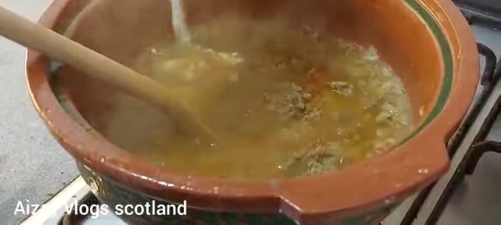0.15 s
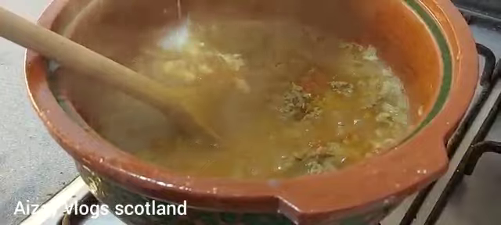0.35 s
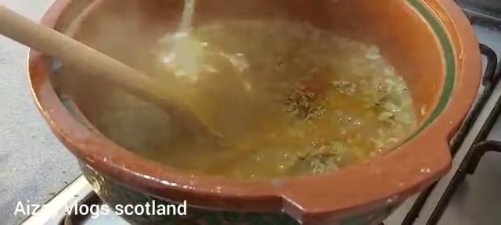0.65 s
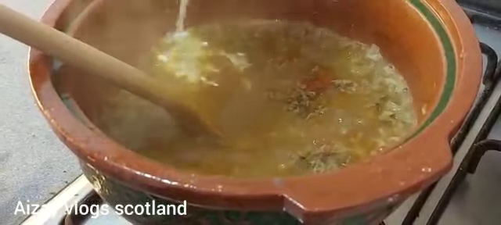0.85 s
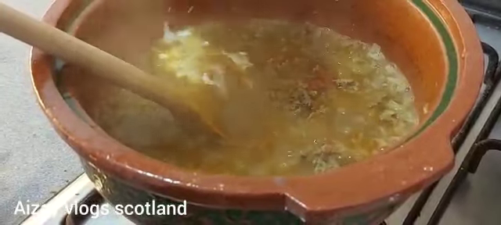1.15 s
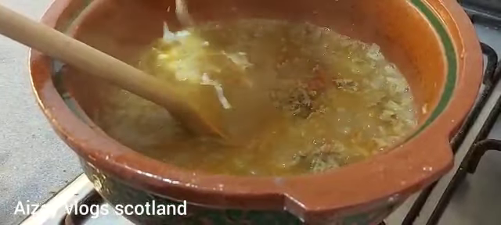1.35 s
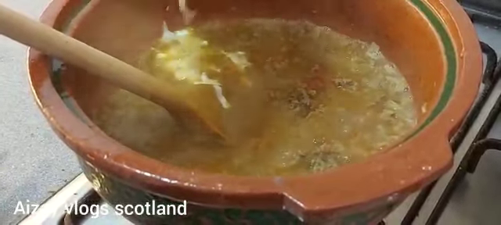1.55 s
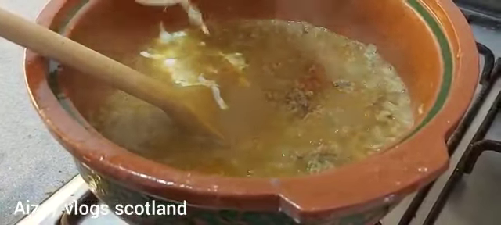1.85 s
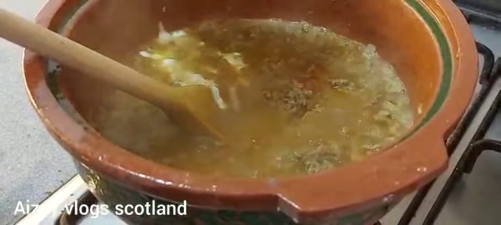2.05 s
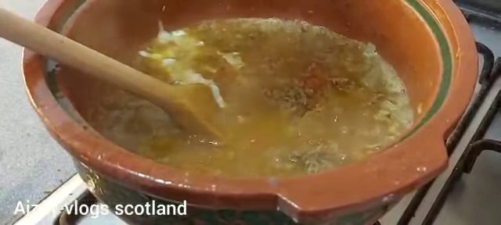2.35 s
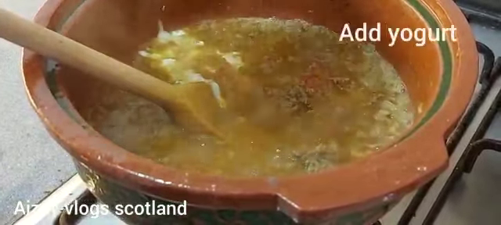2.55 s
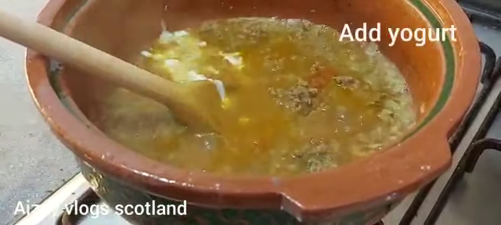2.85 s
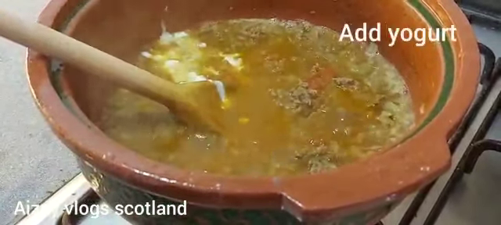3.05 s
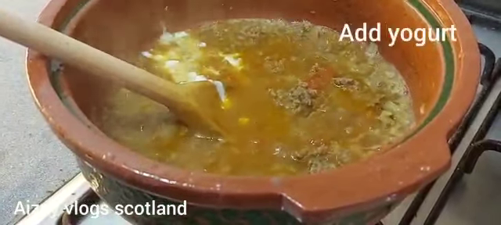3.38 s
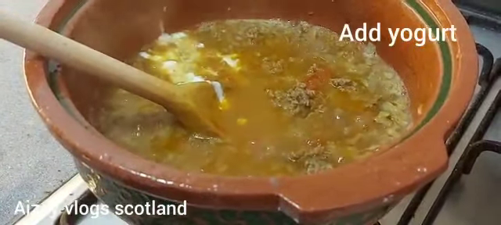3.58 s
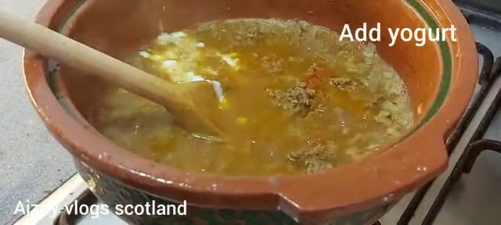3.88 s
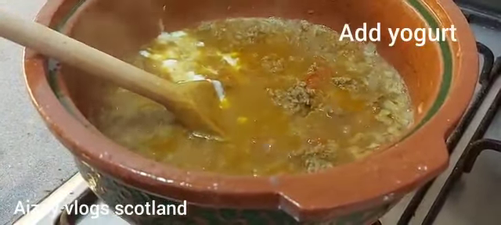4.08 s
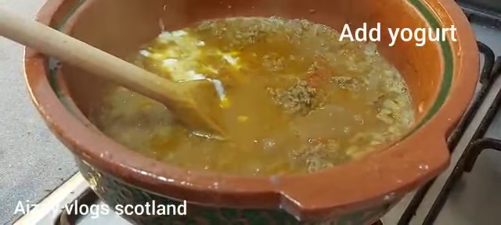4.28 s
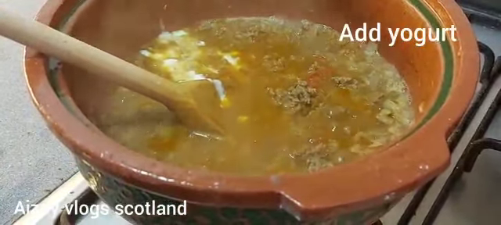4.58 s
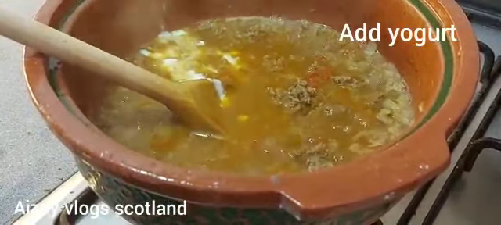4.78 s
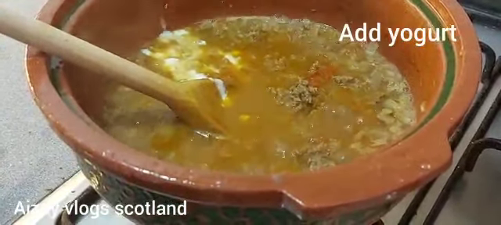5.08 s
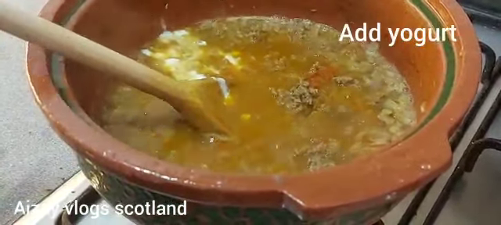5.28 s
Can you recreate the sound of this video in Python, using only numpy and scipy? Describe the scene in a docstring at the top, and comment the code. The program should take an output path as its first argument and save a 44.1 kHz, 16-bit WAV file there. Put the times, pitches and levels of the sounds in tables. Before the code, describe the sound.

Minced meat and sauce simmer in a clay pot on a gas stove, a soft, steady bubbling under a fine hiss of fat. Yogurt drops in with a few wet splats at the start. Single bubbles pop and droplets spit throughout, over a faint low rumble and soft bumps. Two dull knocks come near the end, the second louder. The sound is close, in a small kitchen.

```python
"""Minced meat simmering in a clay pot

On a gas stove in a small kitchen, yogurt splats into the sauce and the trapped air rings.
Bubbles, each a damped oscillator, burst in the sauce and crackle in the fat at the rim;
larger ones pop and droplets spit, over a low rumble, a faint hum and some dull shuffling.
A few soft bumps and two dull knocks set the stove and the room ringing."""
import sys
import numpy as np
from scipy import signal
from scipy.fft import rfft, irfft, next_fast_len
from scipy.io import wavfile
from scipy.ndimage import map_coordinates

SR = 44100
rng = np.random.default_rng(int(sys.argv[2]) if len(sys.argv) > 2 else 0)


def inscribe(sig):
    """Save sig as 16-bit PCM at rate SR to the path in sys.argv[1].

    A 1-D sig is mono; a 2-D sig holds one channel per row.
    Samples are clipped to [-1, 1] before scaling.
    """
    pcm = np.round(np.clip(np.atleast_2d(sig).T, -1, 1) * 32767)
    wavfile.write(sys.argv[1], SR, pcm.astype(np.int16))


N = 239354
TOP_HZ = 15850
# soft contacts: t/s, level/dB, f/Hz
SOFT_BUMPS = [(0.174, -43.5, 106), (1.312, -39.5, 88), (2.427, -33.5, 88.5), (2.469, -32.5, 101),
              (2.842, -36, 103), (4.246, -32.5, 106), (4.297, -38, 112), (4.4, -34.5, 79.6),
              (4.435, -36.5, 90.6), (5.37, -39.5, 110)]


def amp(db):
    """Amplitude ratio of a level in decibels."""
    return 10 ** (np.asarray(db) / 20)


def unit(x):
    """Normalisation to rms 1."""
    return x / np.sqrt(np.mean(x ** 2) + 1e-20)


def crest(x):
    """Normalisation to peak 1."""
    return x / (np.abs(x).max() + 1e-20)


def along(points, hz):
    """Interpolation of (f/Hz, value) points on a logarithmic frequency axis."""
    f, v = np.transpose(points)
    return np.interp(np.log(hz + 1), np.log(f + 1), v)


def wobble(rate):
    """Slow random modulation: a spline through rate knots a second."""
    knots = rng.standard_normal(int(N * rate / SR) + 4)
    return map_coordinates(knots, [np.arange(N) * rate / SR])


def filtered(x, response):
    """Linear filtering: the spectrum times a frequency response."""
    n = x.shape[-1]
    m = next_fast_len(n + SR // 4)
    return irfft(rfft(x, m) * response(np.fft.rfftfreq(m, 1 / SR)), m)[..., :n]


def resonance(f, hz, width):
    """Band-pass response of a damped oscillator."""
    return 1j * f * width / (hz * hz - f * f + 1j * f * width)


def add(track, s, sound):
    """Superposition of a sound on a track from time s."""
    start = max(round(s * SR), 0)
    part = track[..., start:start + sound.shape[-1]]
    part += sound[..., :part.shape[-1]]


def spread(pair):
    """Partial coherence: long waves reach left and right alike, short ones unrelated."""
    # likeness of the two sides: f/Hz, coherence
    coherence = [(60, 0.99), (130, 0.97), (290, 0.77), (640, 0.71), (1400, 0.091), (3000, 0.0019),
                 (15000, 0)]
    turn = lambda hz: np.arccos(np.clip(along(coherence, hz), -1, 1)) / 2
    mid, side = filtered(pair, lambda hz: np.array([np.cos(turn(hz)), np.sin(turn(hz))]))
    return np.array([mid + side, mid - side])


def coloured(pair, spectrum):
    """Spectral shaping by (f/Hz, level/dB) points; stereo, rms 1."""
    return unit(filtered(spread(pair), lambda hz: amp(along(spectrum, hz))))


def bubble(t, hz, cycles, glide):
    """Bubble resonance: trapped gas rings, gliding in pitch as it decays 60 dB over its cycles."""
    age = t * hz / np.maximum(cycles, 2)
    return np.sin(2 * np.pi * hz * t * (1 + glide * np.minimum(age, 1))) * amp(-60 * age)


def pot_reflections(t60):
    """Diffuse scattering in the pot: an impulse response of decaying noise."""
    t = np.arange(SR // 8) / SR
    cloud = rng.standard_normal((2, len(t))) * amp(-60 * t / t60)
    return cloud / np.linalg.norm(cloud[0])


def swarm(rate, hz, octaves, cycles, size_db, pot_t60, places):
    """Incoherent sum of rate bubbles a second, each place with its own reflections; rms 1."""
    out, steps = np.zeros((2, N)), np.arange(int(SR * cycles / hz * 2))
    for _ in range(places):
        when, tuning, rarity = np.hsplit(rng.random((int(rate / places * N / SR), 3)), 3)
        pitch = hz * 2 ** (octaves * (2 * tuning - 1))
        size = amp(-size_db * np.log(np.maximum(rarity, .02)))
        size *= np.sqrt(pitch / hz)  # low bubbles ring longer, so start softer for equal energy
        rings = size * bubble(steps / SR, np.minimum(pitch, TOP_HZ), cycles, glide=0.046)
        starts = (when * N).astype(int)
        direct = np.bincount((starts + steps).ravel(), rings.ravel(), N)[:N]
        out += signal.oaconvolve(direct[None], pot_reflections(pot_t60), axes=1)[:, :N]
    return unit(out)


def simmer():
    """Bubble resonances overlap into noise all over the sauce; some stand out as plips."""
    # spectrum of the sauce: f/Hz, level/dB
    spectrum = [(120, -16), (190, -6.5), (240, -10.5), (280, -1.5), (400, -4.5), (455, -13), (520, -4.5),
                (740, -5), (950, -7.5), (1290, 1), (1560, -1.5), (1750, -9), (2800, -16.5), (4500, -58)]
    # strength of the simmer: t/s, level/dB
    strength = [(0, -50.5), (.6, -53.5), (1.3, -51), (2, -52), (3.3, -52.5), (3.8, -51.5), (5.4, -51.5)]
    blips = swarm(rate=420, hz=1156, octaves=1.317, cycles=16.6, size_db=2, pot_t60=0.18, places=1)
    plips = swarm(rate=20, hz=1554, octaves=0.61, cycles=14, size_db=-0.5, pot_t60=0.045, places=3)
    broth = coloured(rng.standard_normal((2, N)) + amp(-9.5) * blips, spectrum)
    level_db = np.interp(np.arange(N) / SR, *np.transpose(strength))
    return amp(level_db + 0.88 * wobble(12)) * (broth + amp(-9.5) * plips)


def sizzle():
    """Heavy damping broadens tiny steam bubbles in the fat into a hiss; larger ones tick."""
    # spectrum of the hiss: f/Hz, level/dB
    spectrum = [(1290, -13.5), (2200, -8.5), (2850, -8.5), (3500, -2), (3850, -5.5), (4700, -3.5),
                (5600, -4.5), (7200, -3), (8300, -4.5), (9300, -1), (10300, 2.3), (12400, 1.5),
                (13800, -2.5), (15700, -4.5)]
    # resonances around the rim: f/Hz, bandwidth/Hz, level/dB
    rim = [(3520, 30, -1.5), (4190, 260, 6), (5400, 380, -2)]
    start_db, heating_db_per_s = -50, 0.26
    crackle = swarm(rate=1000, hz=8900, octaves=0.22, cycles=1.9, size_db=4, pot_t60=0.051, places=6)
    ticks = swarm(rate=39, hz=6600, octaves=0.43, cycles=9.7, size_db=5, pot_t60=0.09, places=3)
    fizz = coloured(rng.standard_normal((2, N)) + amp(-6) * crackle, spectrum)
    fizz = filtered(fizz, lambda f: 1 + sum(amp(db) * resonance(f, hz, width) for hz, width, db in rim))
    level_db = start_db + heating_db_per_s * np.arange(N) / SR
    return amp(level_db + 0.48 * wobble(22.31)) * (unit(fizz) + amp(-16.5) * ticks)


def rumble():
    """Amplitude-modulated low noise: an uneven rumble that swells around each bump."""
    # spectrum of the rumble: f/Hz, level/dB
    spectrum = [(12, -47), (20, -24), (43, -15), (81, 1.5), (112, 2), (139, -4.5), (147, 1.5), (156, -27),
                (193, -8.5), (220, -18), (290, -59), (480, -120)]
    steady_db, shake_db, settle_s = -56, -23.5, 0.11
    t = np.arange(N) / SR
    swells = sum(amp(db + shake_db) * np.exp(-np.abs(t - s) / settle_s) for s, db, _ in SOFT_BUMPS)
    envelope = amp(steady_db + 3.9 * wobble(4.27)) + swells
    return envelope * coloured(rng.standard_normal((2, N)), spectrum)


def hum():
    """A faint tone, modulated in frequency and amplitude, swells and fades in spells."""
    # spells of humming: t/s, duration/s, level/dB
    spells = [(0.435, 0.3, -54.5), (0.952, 0.32, -56.5), (2.905, 0.416, -51.5), (5.023, 0.25, -51.5)]
    hz, rest_db, fade_s = 124, -65.5, 0.041
    t = np.arange(N) / SR
    envelope = sum(amp(db) * np.clip(np.minimum(t - s, s + length - t) / fade_s, 0, 1)
                   for s, length, db in spells)
    tone = unit(np.sin(2 * np.pi * np.cumsum(hz + 2.76 * wobble(10)) / SR))
    return np.maximum(envelope, amp(rest_db)) * amp(0.57 * wobble(12)) * tone


def kitchen(x, wet_db):
    """Reverberation: a diffuse tail follows the direct sound, each frequency at its own decay rate."""
    # reverberation time: f/Hz, T60/s
    decay = [(100, 0.37), (500, 0.11), (2000, 0.18), (12000, 0.17)]
    hz, t, noise = signal.stft(rng.standard_normal((2, SR // 2)), SR, nperseg=256)
    decaying = noise * amp(-60 * t / along(decay, hz)[:, None])
    tail = spread(signal.istft(decaying, SR, nperseg=256)[1])
    tail = np.pad(tail, ((0, 0), (SR // 200, 0)))  # reflections arrive 5 ms late
    echo = signal.fftconvolve(x, tail, axes=1)[:, :x.shape[-1]]
    return x + amp(wet_db) * unit(echo) * np.sqrt(np.mean(x ** 2))


def splats():
    """Air entrainment: yogurt hits the sauce with a wet snap, then the trapped air rings."""
    # yogurt drops: t/s, level/dB, f/Hz, ring cycles, relative glide, snap re ring/dB
    drops = [(.0095, -39.5, 2450, 35, .03, -12), (0.017, -29, 853, 84, 0.056, 7.5),
             (0.0483, -25.5, 2450, 61, -.15, 12.5), (0.057, -34, 3800, 20, -.05, 4),
             (0.06, -27.5, 1280, 17, .05, -3), (0.2332, -30.5, 876, 97, 0.0095, 8.5),
             (0.2571, -32, 2320, 70, .22, 3), (.312, -33, 1590, 21, .05, -3),
             (0.3168, -31, 1500, 12, .05, 3), (0.361, -34.5, 1250, 18, .05, 2),
             (.374, -35, 900, 22, 0.033, 1)]
    snap_t60, snap_hz = 0.0057, 1380
    out, t = np.zeros((2, N)), np.arange(SR // 4) / SR
    slap = amp(-60 * t / snap_t60) + amp(-10 - 60 * t / 0.057)
    for s, db, hz, cycles, glide, snap_db in drops:
        snap = spread(rng.standard_normal((2, len(t)))) * slap
        snap = filtered(snap, lambda f: resonance(f, snap_hz, 2.4 * snap_hz) ** 2)
        drop = crest(bubble(t, hz, cycles, glide)) + amp(snap_db) * crest(snap)
        add(out, s, kitchen(amp(db) * crest(drop), wet_db=-3))
    return out


def lesser_pops(rate=3.5, db=-44, spread_db=2, hz=1388, octaves=0.17, cycles=37, splash_db=-5):
    """A jittered pulse train: rows for pops(), one at random in each 1/rate seconds."""
    chance = rng.uniform(-0.92, 1, (int(rate * N / SR), 3))
    return [((k + (1 + when) / 2) / rate, db + spread_db * size, hz * 2 ** (octaves * pitch),
             cycles, splash_db) for k, (when, size, pitch) in enumerate(chance)]


def pops():
    """Cavity resonance: a large bubble tears open with a wet splash, and its hollow rings."""
    # large bubbles: t/s, level/dB, f/Hz, ring cycles, splash re ring/dB
    bursts = [(.612, -43, 1760, 22, -7), (.716, -39.5, 1420, 18, 0), (.888, -42, 2930, 42, 2),
              (1.055, -39, 1240, 20, -6), (1.092, -43, 1320, 22, -10), (1.373, -36, 1330, 23, -4),
              (1.517, -32.5, 1270, 16, 2), (1.637, -28, 865, 27, 1.5), (1.638, -30, 1435, 48, -9),
              (1.639, -42, 559, 54, -13), (1.828, -40, 1410, 31, -6), (1.871, -37, 1360, 19, 7),
              (2.147, -34.5, 1570, 19, 1), (2.3595, -38, 2690, 45, -2), (2.404, -41.5, 1320, 28, -8),
              (2.428, -43, 1336, 54, -11), (3.557, -36.5, 1870, 40, 9), (3.847, -37.5, 1180, 17, -15),
              (3.88, -36, 1390, 17, -3), (4.113, -37.5, 2170, 14, -1), (4.905, -39, 1340, 24, 0),
              (4.966, -35, 1320, 40, -9), (5.099, -33.5, 1890, 14, 1), (5.104, -32.5, 2020, 20, 3),
              (5.306, -33.5, 1930, 28, 4), (5.323, -35, 1650, 22, -4)]
    out, t = np.zeros((2, N)), np.arange(SR // 4) / SR
    tear = (amp(-60 * t / 0.0069) + amp(-7.5 - 60 * t / 0.05)) * (1 - np.exp(-t / 0.00051))
    for s, db, hz, cycles, splash_db in bursts + lesser_pops():
        splash = rng.standard_normal((2, len(t))) * tear
        splash = filtered(splash, lambda f: resonance(f, hz, 2 * hz) ** 2)
        burst = crest(bubble(t, hz, cycles, glide=0.053)) + amp(splash_db) * crest(splash)
        add(out, s, kitchen(amp(db) * crest(burst), wet_db=-1))
    return out


def swing(t, hz, rise_s, t60):
    """Damped oscillation with a gradual onset; peak 1."""
    return crest(np.sin(2 * np.pi * hz * t) * (1 - np.exp(-t / rise_s)) ** 2 * amp(-60 * t / t60))


def bumps():
    """A soft contact excites only low frequencies: a few swings and no click."""
    out, t = np.zeros((2, N)), np.arange(SR // 3) / SR
    for s, db, hz in SOFT_BUMPS:
        bump = amp(db) * swing(t, hz, rise_s=0.011, t60=0.06)
        add(out, s, kitchen(np.array([bump, bump]), wet_db=-4.5))
    return out


def spits():
    """Flash boiling: a water droplet bursts in hot fat with a sharp tick and a short ping."""
    # droplets: t/s, level/dB, f/Hz, relative bandwidth, ping re tick/dB, left re right/dB
    droplets = [(.333, -37, 12600, .06, -5, 4), (.612, -42, 6750, .15, -8, -2),
                (.662, -42.5, 6960, .1, -7, 0), (.797, -42.5, 6160, .12, -6, -4),
                (.958, -34.5, 11870, .06, -6, -4), (1.169, -38.5, 6500, .12, -9, -2),
                (1.32, -41, 10000, .08, -6, 0), (1.637, -29.5, 7120, 0.1, -10, 0),
                (1.6378, -33, 3940, 0.79, -16, 0), (1.786, -32.5, 9900, 0.22, -14, -1),
                (2.3605, -35.5, 4840, 0.088, 0, 1), (3.304, -43, 10700, .25, -12, 0),
                (3.556, -32.5, 5140, 0.99, -22, 0), (3.7509, -31, 4800, 0.22, -7, 4),
                (3.810, -34.5, 10800, .1, -12, -4), (3.975, -30.5, 11600, .3, -13, -3),
                (4.010, -33, 5900, .1, -8, 0), (4.243, -34.5, 11200, .18, -12, 2),
                (4.261, -31, 10500, .2, -13, -3), (4.3096, -37, 12000, .3, -14, -2),
                (4.692, -33, 11220, .1, -15, 0), (4.994, -25.5, 10040, 0.1, -12, 0)]
    ping_rise_s, ping_t60 = 0.00026, 0.017
    out, t = np.zeros((2, N)), np.arange(SR // 5) / SR
    decay = amp(-60 * t / .02) + amp(-17 - 60 * t / .05)
    for s, db, hz, width, ping_db, pan_db in droplets:
        snap = rng.standard_normal((2, len(t))) * decay
        tick = filtered(snap, lambda f: resonance(f, hz, width * hz) * resonance(f, hz, hz))
        ping = np.sin(2 * np.pi * hz * t) * (1 - np.exp(-t / ping_rise_s)) * amp(-60 * t / ping_t60)
        spit = crest(crest(tick) + amp(ping_db) * crest(ping))
        gains = amp(db + pan_db * np.array([[.5], [-.5]]))
        add(out, s, kitchen(gains * spit, wet_db=-1.5))
    return out


def shuffles():
    """Friction noise: a dull, grainy rubbing swells and fades beside some of the bumps."""
    # rubbing strokes: t/s, duration/s, level/dB
    strokes = [(2.262, 0.28, -54), (2.77, 0.14, -56.5), (5.313, 0.1, -53)]
    spectrum = [(80, -19), (150, -4.5), (280, -3), (420, -16), (900, -20), (2000, -33)]  # f/Hz, level/dB
    out, t = np.zeros((2, N)), np.arange(N) / SR
    rub = coloured(rng.standard_normal((2, N)), spectrum)
    for s, length, db in strokes:
        out += amp(db) * np.sin(np.pi * np.clip((t - s) / length, 0, 1)) * rub
    return out * amp(4.3 * wobble(45))


def knocks():
    """Modal vibration: a padded blow touches, lands and rebounds, each contact ringing the stove."""
    # blows: t/s, level/dB, hard edge/dB, thud level/dB
    blows = [(4.1542, -44.5, -6.5, -29), (4.668, -34.5, -18.5, -20)]
    # modes of the stove's body: f/Hz, level/dB, T60/s
    modes = [(72.6, -10, 0.48), (85.3, -6, 0.4), (123.5, -5.5, 0.29), (158, -9, 0.18), (198.5, -12.5, 0.28),
             (231.6, -19, 0.55), (256, -11.5, 0.56), (322, -13.5, .34), (333, -21.5, 1), (403, -4, 0.22),
             (441, -2, 0.23), (510, -15, 0.36), (624, -2.5, 0.22), (707, -2, 0.14), (783, -12, 0.11),
             (950, -14, 0.22), (1147, -23, 0.25), (1558, -16, 0.16)]
    # touch, landing and rebound: delay/s, level/dB
    contacts = [(0, -1.5), (.0098, -0.5), (.049, -8.5)]
    # spectra of padded and hard contact: f/Hz, level/dB
    padded = [(40, -34), (70, -2), (130, -4), (200, -7), (270, -7), (400, -2), (520, -4.5), (760, -8),
              (930, -18), (1500, -28), (2000, -38), (3500, -49), (7000, -90)]
    hard = [(400, -26), (1100, 4), (2400, -7.5), (5000, -25)]
    # added on the left, subtracted on the right
    phase = [(120, 0.073), (300, 0.51), (700, 0.7), (1500, 0.99)]  # f/Hz, phase/rad
    tilt = [(150, -.7), (300, 0.5), (450, 0.5), (700, 2.5), (2000, 1)]  # f/Hz, level/dB
    sides = np.array([[1], [-1]])
    out, t = np.zeros((2, N)), np.arange(SR * 3 // 4) / SR
    # neighbouring modes swing in antiphase
    ring = unit(sum((-1) ** k * amp(db - 60 * t / t60)
                    * np.sin(2 * np.pi * hz * t + sides * along(phase, hz))
                    for k, (hz, db, t60) in enumerate(modes)))
    for s, db, edge_db, thud_db in blows:
        blow = np.zeros((2, len(t)))
        for delay, contact_db in contacts:
            push = coloured(rng.standard_normal((2, len(t))), padded) * amp(-60 * t / 0.21)
            contact = (ring + amp(2) * unit(push)) * (1 - np.exp(-t / 0.00076))
            add(blow, delay, amp(contact_db) * contact)
        clack = coloured(rng.standard_normal((2, len(t))), hard)
        clack *= amp(-60 * t / 0.2) * (1 - np.exp(-t / 0.0026))
        blow = unit(blow) + amp(edge_db - 6) * unit(clack)
        blow = filtered(blow, lambda hz: amp(along(tilt, hz) * sides))
        thud = amp(thud_db) * swing(t, hz=114, rise_s=0.011, t60=0.026)  # the weight of the blow
        add(out, s, kitchen(amp(db) * unit(blow), wet_db=-12) + thud)
    return signal.sosfilt(signal.butter(3, 60, "high", fs=SR, output="sos"), out)


def scene():
    """Superposition of the pot close by and the low sounds around it."""
    # balance of the pot's sound: f/Hz, left re right/dB
    balance = [(200, 6), (700, -0.5), (1300, 2), (2400, 2), (4400, -1.5), (8000, -0.5), (15000, -4)]
    pot = simmer() + sizzle() + splats() + pops() + spits()
    pot = filtered(pot, lambda hz: amp(along(balance, hz) * np.array([[.5], [-.5]])))
    return pot + rumble() + hum() + bumps() + shuffles() + knocks()


def record(dry):
    """Band limiting: an ideal low-pass filter at TOP_HZ."""
    return filtered(dry, lambda hz: hz < TOP_HZ)


dry = scene()
out = record(dry)
inscribe(out)
```